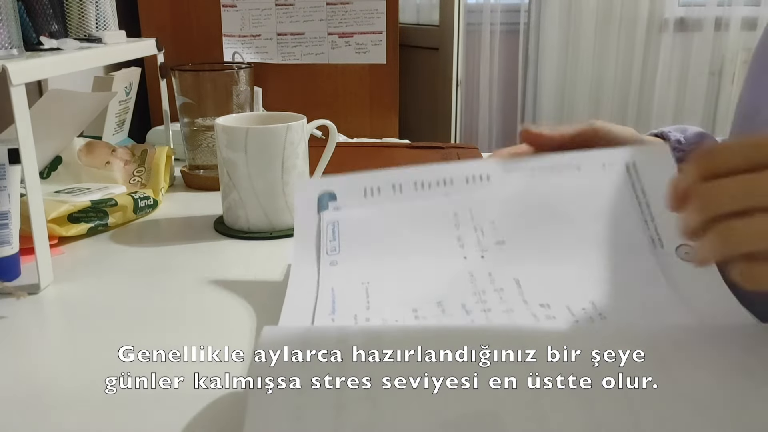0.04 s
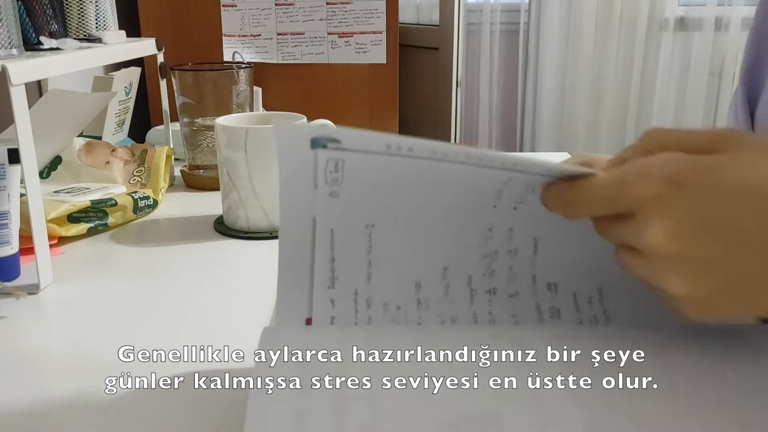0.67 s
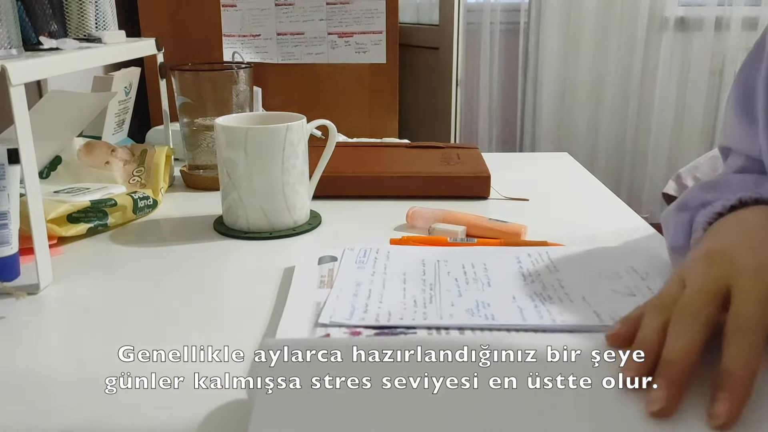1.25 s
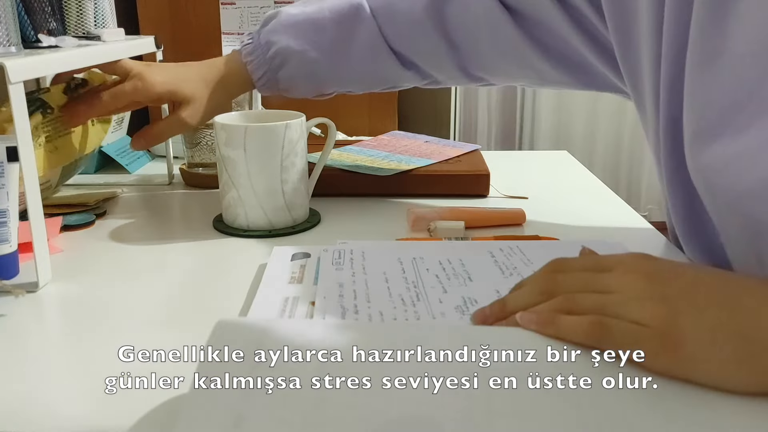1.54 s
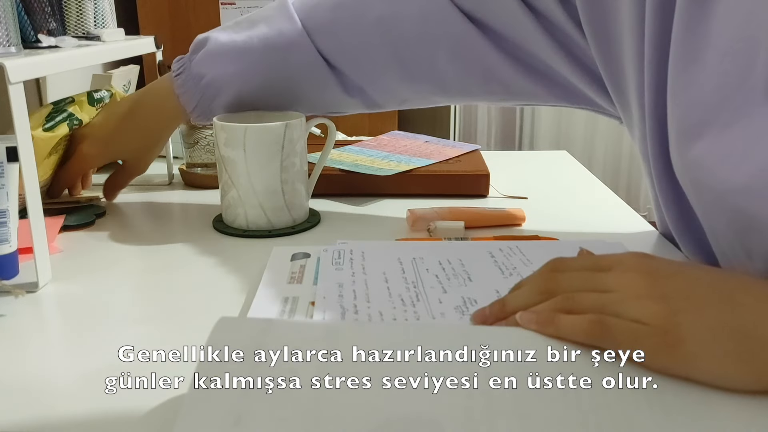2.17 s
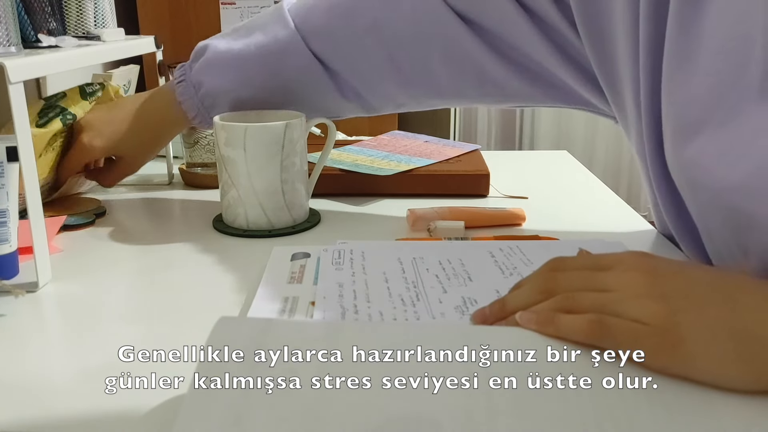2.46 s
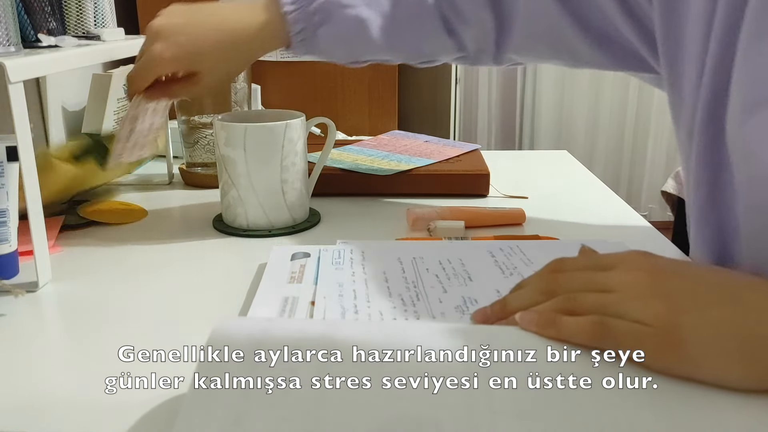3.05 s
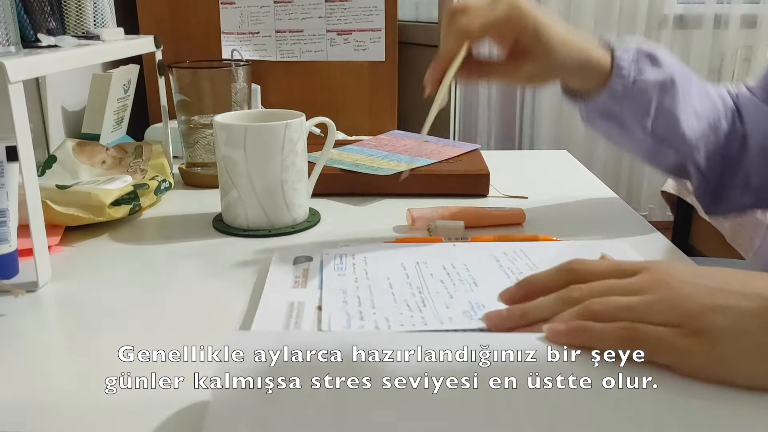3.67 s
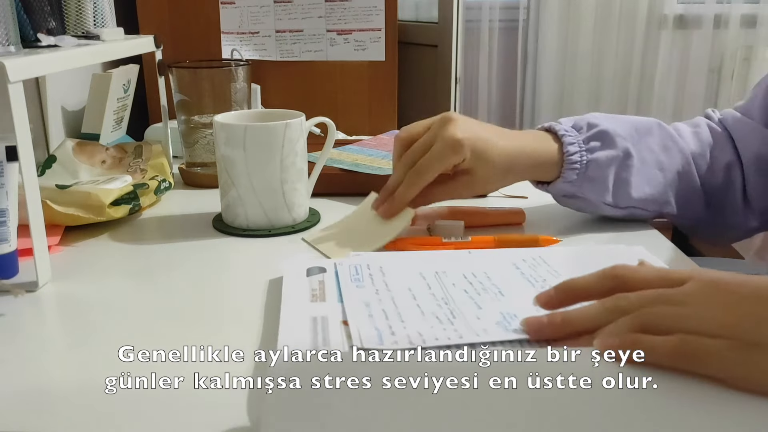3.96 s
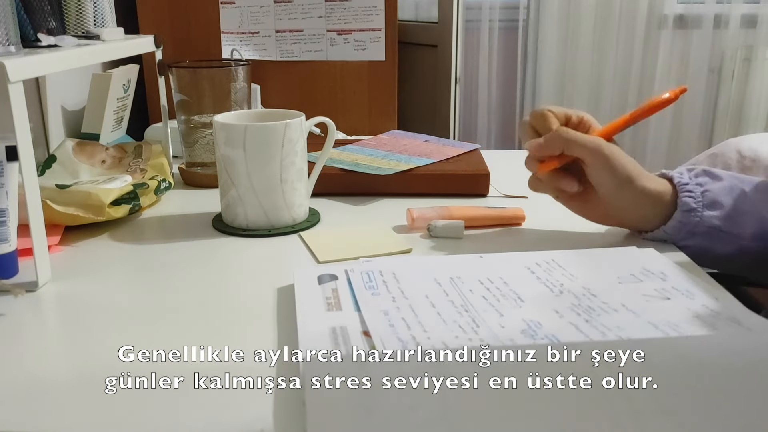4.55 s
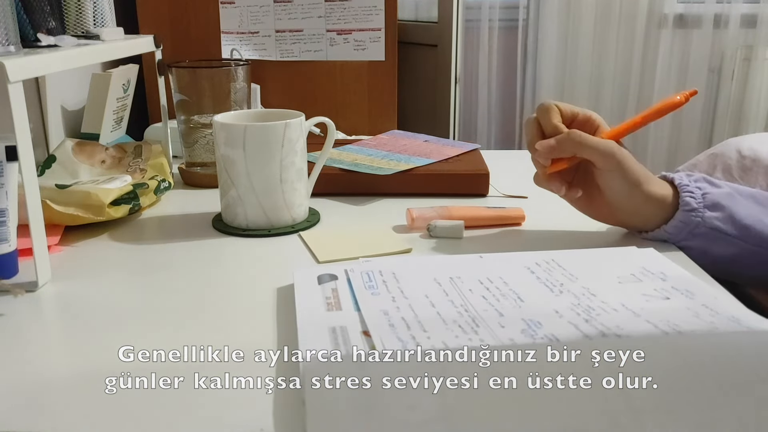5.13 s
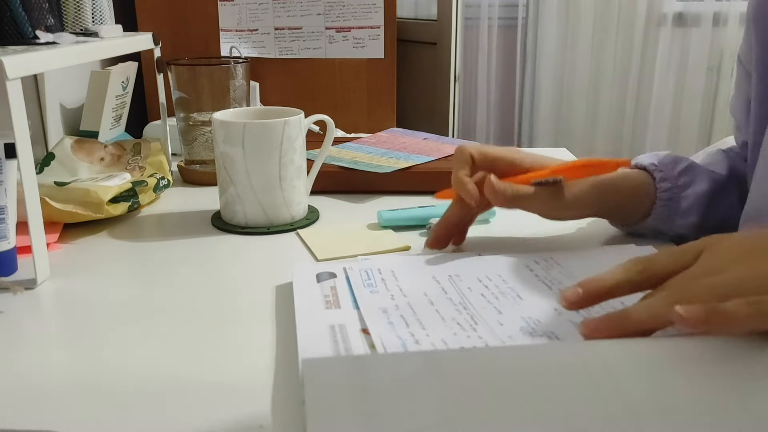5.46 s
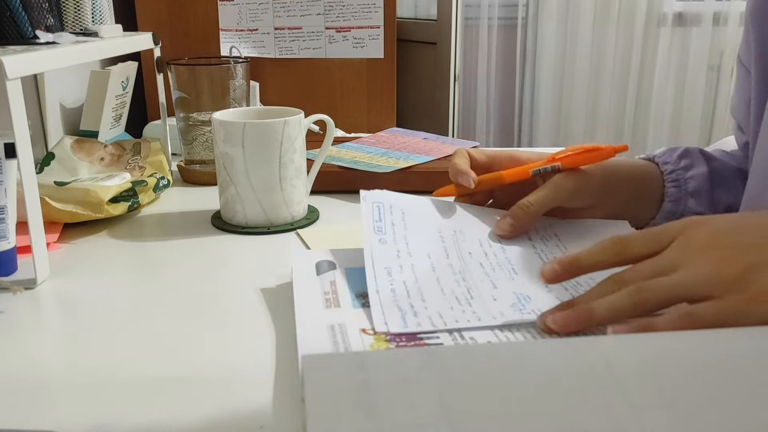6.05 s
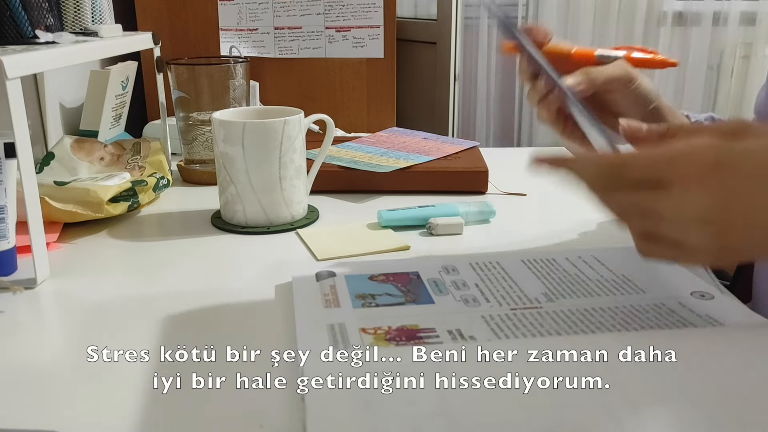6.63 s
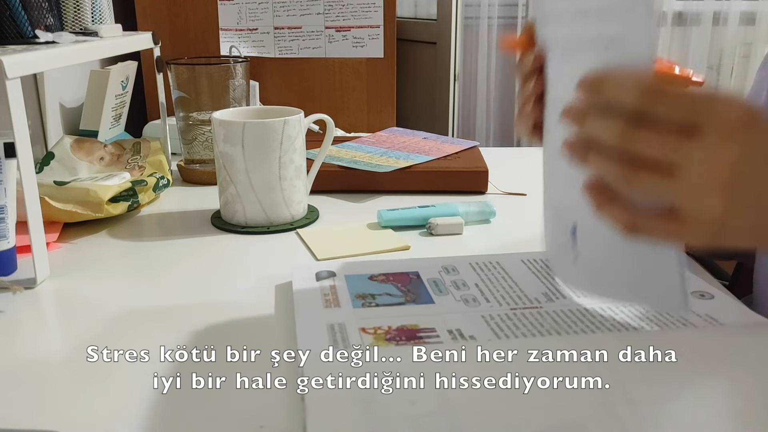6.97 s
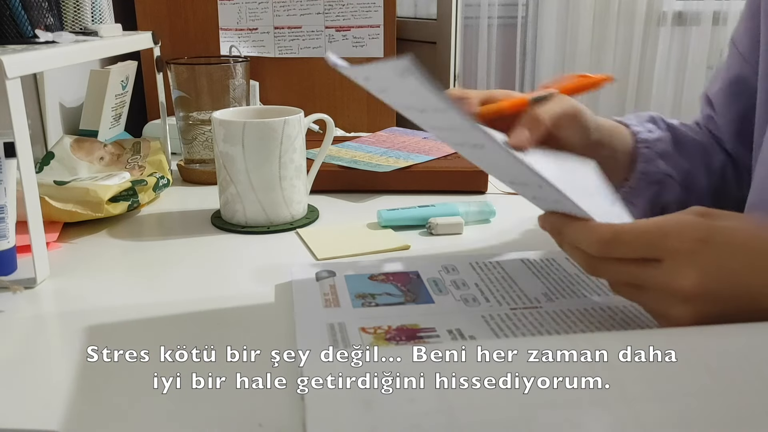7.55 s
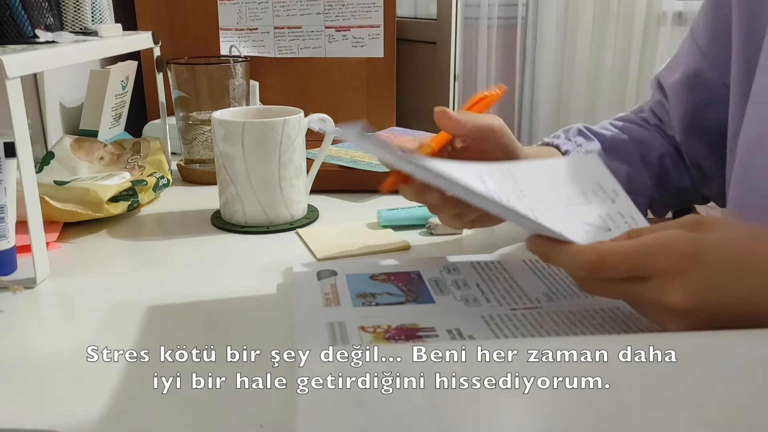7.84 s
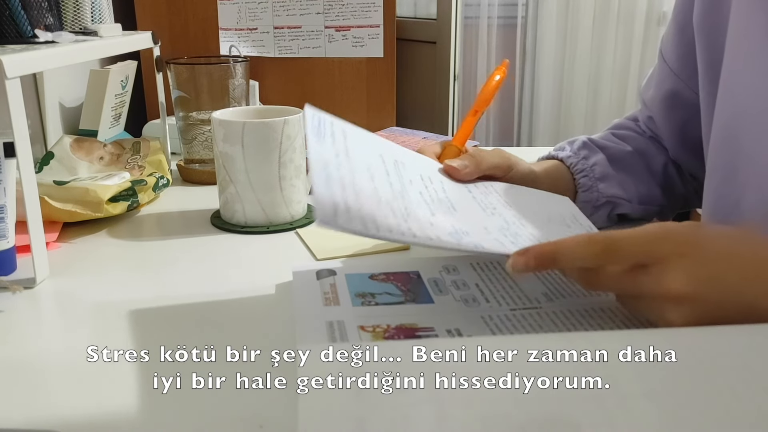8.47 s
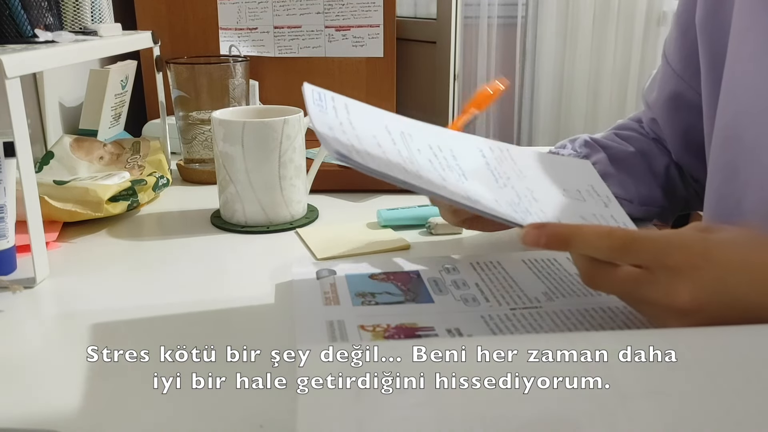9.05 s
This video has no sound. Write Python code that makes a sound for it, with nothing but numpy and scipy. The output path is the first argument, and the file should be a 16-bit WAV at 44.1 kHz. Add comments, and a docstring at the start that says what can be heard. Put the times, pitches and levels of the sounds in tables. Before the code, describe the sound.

Everything is heard close up at a desk in a quiet room, with short echoes and a faint low rumble. For the first 1.5 seconds, workbook pages swish and rustle softly as they are opened and smoothed. From 1.5 to 3.2 seconds a stiff plastic packet crinkles with sharp, dry crackles and small dull thuds. Faint paper sliding follows, with a light tap near 3.9 seconds. At 4.2 seconds a plastic pen clatters briefly on the desk, the loudest sound. A duller bump on the desk comes at 5 seconds. Loose sheets then rustle and scrape with little crease snaps, and at 7 seconds they drop edge-on onto the workbook with a crisp tap. Another paper snap comes at about 7.4 seconds. Light rustling continues until about 8.3 seconds, then thins to a few tiny ticks and scrapes by 9.2 seconds.

```python
"""A desk in a quiet room, heard close up by a phone with two microphones. A workbook is laid open and
smoothed flat, a hand digs sticky notes out from behind a crinkly plastic packet, a pen knocks on the
desk, an arm bumps it, then loose sheets are lifted, dropped on their edge to square them, and held.
Paper rustles as its fibres catch and slip, creases snap, and blows ring the modes of desk and workbook.
Short echoes and a low room rumble sit behind it all."""
import sys
import numpy as np
from scipy import signal
from scipy.fft import rfft, irfft
from scipy.io import wavfile
from scipy.ndimage import uniform_filter1d, map_coordinates

SR = 44100
rng = np.random.default_rng(int(sys.argv[2]) if len(sys.argv) > 2 else 0)


def wrap_up_sound(samples):
    """Save the sound to the file named by the first command line argument, as 16-bit audio."""
    columns = np.atleast_2d(samples).T
    # keep every value between -1 and 1, then stretch to whole-number steps
    tamed = np.clip(columns, -1, 1)
    steps = np.round(tamed * 32767).astype(np.int16)
    wavfile.write(sys.argv[1], SR, steps)


N = 410130
TIME = np.arange(N) / SR

# Hand strokes: start_s, attack_s, hold_s, release_s, level_db, pressure_db
BOOK_STROKES = [(0.003, 0.0036, 0.0026, 0.0062, -54, 4.5), (.08, 0.037, 0.017, 0.04, -55.5, 2),
                (.22, 0.035, 0.095, 0.04, -63.5, -2), (.335, 0.012, 0.097, 0.032, -58, -3),
                (.44, 0.0053, 0.0091, 0.065, -52.5, -16), (.55, 0.08, 0.03, 0.019, -50.5, -6),
                (.70, 0.021, 0.26, 0.053, -60, -4.5), (.97, 0.032, 0.11, .05, -49.5, 2),
                (1.11, 0.024, 0.031, 0.033, -49, 2.5), (1.18, 0.025, 0.012, 0.055, -47, 3),
                (1.28, 0.046, 0.13, 0.083, -56, 1.5)]  # opened, then smoothed flat
PACKET_STROKES = [(1.545, 0.044, 0.094, 0.013, -53, 2), (1.715, 0.023, 0.012, 0.068, -54.5, 3.5),
                  (1.785, 0.0059, 0.19, 0.0079, -51.5, 1), (1.86, 0.021, 0.098, 0.013, -49.5, -16),
                  (1.98, 0.044, 0.12, 0.036, -51.5, -10), (2.15, 0.0068, 0.02, 0.08, -60, 5),
                  (2.398, 0.02, 0.0092, 0.034, -51.5, -6.5), (2.46, 0.11, 0.088, 0.12, -55.5, -1.5),
                  (2.6, 0.096, 0.11, 0.041, -48, -21), (2.72, 0.039, 0.089, 0.023, -48.5, -10),
                  (2.85, 0.028, 0.036, 0.068, -49, -9.5), (2.972, 0.0067, 0.04, 0.027, -46, -5.5),
                  (3.03, 0.04, 0.04, 0.012, -38.5, -13.5), (3.12, 0.013, 0.0086, 0.026, -47.5, 5.5)]  # the hand pushes past, gropes behind and pulls out
NOTE_STROKES = [(3.25, 0.057, 0.17, .1, -78, -6), (3.45, 0.14, 0.027, 0.14, -61, -6),
                (3.63, 0.017, 0.25, 0.065, -66.5, 7), (3.68, 0.024, 0.027, 0.031, -60, -17),
                (3.9, 0.016, .21, 0.042, -59.5, 3.5), (3.975, 0.018, .015, 0.012, -49.5, -9),
                (4.13, 0.054, .03, 0.039, -53, 1.5), (4.28, .03, 0.25, .1, -72.5, -10),
                (4.38, 0.043, 0.071, 0.019, -64.5, -20.5)]  # peeled off and laid down; the hand slides on, the sleeve draws back
SHEET_STROKES = [(4.69, .055, 0.0045, 0.017, -63, -5), (4.8, 0.039, 0.01, 0.024, -59, -8.5),
                 (5.03, 0.019, 0.009, 0.043, -59.5, 11.5), (5.2, 0.0096, 0.015, 0.055, -44.5, -10.5),
                 (5.34, 0.069, 0.016, 0.14, -59, -3.5), (5.594, 0.016, 0.025, 0.024, -47.5, -23),
                 (5.75, 0.022, 0.02, 0.029, -56, -2.5), (5.81, 0.02, 0.047, 0.14, -56.5, -8.5),
                 (5.89, 0.024, 0.019, 0.0089, -59, -13), (5.98, 0.035, 0.27, 0.029, -62, -11.5),
                 (6.27, 0.04, 0.2, 0.055, -61.5, -13), (6.61, 0.059, 0.055, 0.049, -60, -18.5),
                 (6.72, 0.039, 0.063, 0.013, -56.5, -8), (6.95, 0.039, 0.013, 0.0091, -65, -12),
                 (7.003, 0.0009, 0.14, 0.15, -43.5, -14), (7.45, 0.16, 0.14, 0.044, -59, -12.5),
                 (7.64, 0.044, 0.015, 0.05, -55.5, -23), (7.76, 0.045, 0.067, 0.051, -68, -3.5),
                 (7.87, 0.042, 0.03, 0.025, -49, -15), (7.96, 0.017, 0.12, 0.013, -57, -15.5),
                 (8.14, 0.03, .01, 0.064, -66.5, -8.5), (8.24, 0.072, 0.11, 0.068, -70.5, -8)]  # gathered, lifted, let slide onto their edge, held
def handling():
    """Four rustle layers, each with its own grain: workbook, packet, sticky note and loose sheets."""
    return [
        rustle(BOOK_STROKES, slips_per_s=2500, spread_db=3.5, jerk_db=1.5, bend_db=-0.8, flex_hz=590,
               flex_share=0.36, mix_db=(-8.5, -5, -4, -11), lag=-1.2, room_db=4.5),
        rustle(PACKET_STROKES, slips_per_s=450, spread_db=2.5, jerk_db=0.56, bend_db=2, flex_hz=390,
               flex_share=1, mix_db=(-3, -6, -5, -18), lag=9.4, room_db=4.5),
        rustle(NOTE_STROKES, slips_per_s=12000, spread_db=2, jerk_db=0, bend_db=-2.5, flex_hz=457,
               flex_share=0.68, mix_db=(-6.5, -7.5, -7, -13.5), lag=15, room_db=9.5),
        rustle(SHEET_STROKES, slips_per_s=2800, spread_db=3, jerk_db=1.5, bend_db=0.5, flex_hz=357,
               flex_share=1, mix_db=(-2.5, -7, -3, -13), lag=-3.5, room_db=5)]


# Body of a flexing sheet: multiple_of_flex_hz, gain_db
FLEX_EQ = [(0.141, -27.5), (0.352, -3), (0.598, -2), (0.999, -1), (1.401, -1.5), (2, -8.5), (3.5, -17),
           (9, -57.5)]
# Mid rasp, airy hiss and the sparkle of tiny creases popping: freq_hz, gain_db
RASP_EQ = [(300, -36.5), (650, -6.5), (1000, 3.5), (1600, 3.5), (2700, 1.5), (3800, -3.5), (6000, -13.5),
           (14000, -66.5)]
HISS_EQ = [(900, -56.5), (2500, 0), (4000, 9), (6000, 8), (8500, 8), (11000, -4.5), (14500, -1)]
CRINKLE_EQ = [(3000, -13), (8500, -10), (11000, 1.5), (15000, -1), (18000, -22)]
def rustle(table, slips_per_s, spread_db, jerk_db, bend_db, flex_hz, flex_share, mix_db, lag, room_db):
    """Light sliding hisses; pressing adds rasp and flexing. One jerky motion shakes all three."""
    flex_db, rasp_db, hiss_db, crinkle_db = mix_db
    moving = (TIME >= np.floor(table[0][0])) & (TIME < np.ceil(table[-1][0]))
    size = moving.sum()
    shake_db = jerk_db * walk(90)[moving]
    slips = grains(size, slips_per_s, spread_db, smooth=0.4)
    flex_eq = [(multiple * flex_hz, db) for multiple, db in FLEX_EQ]
    rub = 0
    for eq, share, db in (flex_eq, flex_share, flex_db), (RASP_EQ, 1, rasp_db), (HISS_EQ, 0, hiss_db):
        friction = slips + grains(size, slips_per_s, spread_db, smooth=0.2)
        rub += unit(colour(friction, eq)) * strokes(table, share)[moving] * undb(db + shake_db)
    crinkles = colour(grains(size, per_s=240, spread_db=spread_db, smooth=0), CRINKLE_EQ)
    rub += unit(crinkles) * strokes(table, 0)[moving] * undb(crinkle_db)
    sound = np.zeros(N)
    sound[moving] = bend(rub, bend_db)
    return pan(sound, lag), sound * undb(room_db)


def strokes(table, pressure_share):
    """The hand's envelope: each stroke swells, is held and dies away."""
    power = np.zeros(N)
    for start, attack, hold, release, db, pressure_db in table:
        t = TIME[:int((attack + hold + 6 * release) * SR)]
        swell = np.sin(np.pi / 2 * np.minimum(t / attack, 1))
        fade = np.exp(-np.maximum(t - attack - hold, 0) / release)
        add(power, start, (swell * fade * undb(db + pressure_share * pressure_db)) ** 2)
    return np.sqrt(power)


def grains(size, per_s, spread_db, smooth):
    """Fibres catch and slip: tiny clicks of very unequal size over smooth friction noise."""
    strengths = undb(spread_db * np.minimum(rng.exponential(size=size), 5))
    clicks = (rng.random(size) < per_s / SR) * strengths * rng.choice([-1, 1], size)
    return unit(unit(clicks) + smooth * rng.standard_normal(size))


def bend(x, depth_db):
    """A bending sheet shifts its broad resonances from moment to moment."""
    hz, _, frames = signal.stft(x, SR, nperseg=512)
    third_octave = 3 * np.log2(1 + hz / 200)
    moment = np.arange(frames.shape[1]) / 9
    grid = np.meshgrid(third_octave, moment, indexing="ij")
    drift = map_coordinates(rng.standard_normal((24, 512)), grid, mode="mirror")
    return signal.istft(frames * undb(depth_db * drift), SR, nperseg=512)[1][:len(x)]


# Sharp transients: start_s, level_db, pitch_hz, decay_s
SNAPS = [(0.0614, -52, 4000, .002), (0.187, -47, 6000, 0.0033), (.35, -57, 5000, 0.007),
         (.4275, -47, 5000, .005), (0.3889, -53, 1400, 0.0013), (0.458, -40, 2900, 0.0024),
         (0.462, -45, 12500, 0.035), (.6, -48, 12500, .04), (0.9965, -50, 1800, .002),
         (1.1444, -44, 1600, 0.00078), (3.931, -35, 1720, 0.003), (3.9325, -52, 7540, 0.002),
         (4.527, -55, 7100, 0.0019), (4.7955, -57, 6970, 0.0018), (5.038, -32.5, 1180, 0.0051),
         (5.608, -45, 2820, 0.028), (5.874, -43, 1700, 0.003), (5.9615, -39, 2470, 0.0025),
         (6.485, -45.5, 12000, 0.022), (6.81, -46.5, 4900, 0.0058), (6.9206, -48, 6600, 0.0027),
         (7.009, -34.5, 7700, 0.035), (7.0304, -29.5, 1720, 0.00098), (7.0348, -51, 1700, 0.0015),
         (7.353, -31.5, 6800, 0.006), (7.927, -46.5, 890, 0.0053), (8.0656, -44.5, 3990, 0.011),
         (8.71, -63, 6120, 0.0036), (9.172, -68, 2015, 0.0063)]  # creases and edges, plus other sharp contacts such as the arm meeting the desk
PACKET_CRACKLES = [(1.583, -32, 4300, 0.0033), (1.585, -30, 1770, 0.001), (1.5944, -34.5, 6370, 0.0045),
                   (1.645, -31, 4210, 0.0049), (1.6734, -25.5, 5840, 0.0021), (1.676, -43, 1490, 0.0022),
                   (1.6835, -52, 5000, .001), (1.731, -40, 7000, 0.01), (1.741, -23.5, 4180, 0.00062),
                   (1.7418, -29, 5950, .0016), (1.7935, -36.5, 4230, 0.0034), (1.8268, -33, 4000, 0.0043),
                   (1.831, -36, 1440, 0.003), (1.86, -49, 13000, .06), (1.886, -40, 4500, 0.0024),
                   (1.893, -40, 4000, .003), (1.903, -44, 5000, .003), (1.959, -39, 2370, 0.0027),
                   (1.985, -48, 13100, .05), (2.098, -47.5, 1300, 0.0021), (2.2, -53, 2180, 0.0022),
                   (2.3445, -56, 4500, 0.0022), (2.552, -43, 2330, 0.0018), (2.614, -45, 4970, 0.0033),
                   (2.666, -44, 3000, 0.0031), (2.73, -43, 12500, .06), (2.763, -42, 6500, 0.0023),
                   (2.787, -38, 4200, 0.00084), (2.8156, -51, 1100, 0.0015), (2.8856, -43, 7060, 0.0038),
                   (2.899, -42, 7000, 0.0047), (2.926, -40.5, 2240, 0.001), (2.9766, -43, 6500, 0.0039),
                   (3.031, -40, 6500, 0.0032), (3.094, -40, 7000, .003), (3.108, -31.5, 7600, 0.0016),
                   (3.136, -44, 6000, 0.0057), (3.1423, -27.5, 5360, 0.0072), (3.1486, -26.5, 3850, 0.0022),
                   (3.217, -51, 6000, 0.0017)]  # stiff plastic, close and dry
PEN_CLACKS = [(4.1945, -30.5, 2200, 0.0061), (4.2245, -28.5, 1950, 0.0037), (4.2252, -28.5, 2853, 0.0096),
              (4.2285, -23.5, 13000, 0.003), (4.2272, -21.5, 1500, 0.0032), (4.2285, -35, 8000, 0.0068),
              (4.2285, -29, 3706, 0.0087), (4.2365, -32.5, 13000, 0.0037), (4.2345, -28, 1550, .003),
              (4.241, -32.5, 1900, .002), (4.2495, -32.5, 2110, 0.0016)]  # the plastic pen clacks down onto the desk
def snaps(table, lag, room_db, q, tail, tick):
    """A crease flips or hard things touch: a bright tick and brief chatter in a broad resonance."""
    sound, t = np.zeros(N), TIME[:SR // 16]
    for start, db, hz, decay in table:
        chatter = rng.standard_normal(len(t)) * (np.exp(-t / 0.00041) + tail * np.exp(-t / decay))
        snap = band(chatter, hz, q) + tick * band(chatter, hz=9300, q=0.57)
        add(sound, start, undb(db) * crest(snap))
    return pan(sound, lag), sound * undb(room_db)


# Impacts: start_s, level_db, contact_hz, contact_q, ring_time_factor, left_lag_samples, room_db
DESK_KNOCKS = [(3.9322, -32, 376, 0.62, 0.64, 4.5, -1), (4.1935, -35.5, 272, 0.22, 1.2, 3, -19),
               (4.2278, -10.5, 595, 1.05, 0.55, 9, -46), (4.2325, -13.5, 570, 1.3, 0.36, 10.5, -34),
               (4.2415, -20.5, 480, 0.75, 0.2, 23, -28), (4.2485, -32, 1010, 1.5, 0.2, 23, -19),
               (4.275, -36, 375, 4.8, 0.44, 5, -3.5), (4.297, -47.5, 181, 7.5, 0.66, -3, -9),
               (5.0372, -21.5, 321, 11, 0.34, -2, -9.5), (5.05, -28.5, 294, 0.85, 0.18, 4, 0.5),
               (5.073, -39, 178, 2.2, 1.1, 7, -10), (5.085, -52, 530, 16, 3.5, 6, -12),
               (5.216, -42, 268, 6.4, 0.19, 11, -1), (5.21, -46, 95, 1.8, 0.11, 4, -8),
               (5.252, -52, 91, 2, 0.34, 13, -2), (5.784, -48.5, 440, 2.9, 0.91, 7, -11),
               (5.796, -49.5, 240, 1.7, 0.55, 7, -4), (6.408, -46, 755, 1.3, 0.64, 5, 3.5)]  # pen and arm hit the desk
SHEET_LANDINGS = [(7.023, -27.5, 245, 2, 0.63, 4, -12), (7.0295, -32, 500, 2.7, 0.77, 13, -24),
                  (7.0325, -27.5, 830, 2.5, 0.48, 13, -4), (7.04, -34, 290, 4.7, 0.8, 9, -16),
                  (7.0615, -39.5, 193, 1.9, 0.7, 4, -12), (7.05, -41, 98, 2.6, 0.44, 5, -11)]  # the sheets land edge-on on the workbook
# The bodies they ring: pitch_hz, gain_db, t60_s (before ring_time_factor)
DESK_MODES = [(102, -15.5, 0.67), (127, -23, 0.6), (175, -8, 0.18), (245, 3.5, 0.1), (325, -8, 0.087),
              (482, -9.5, 0.099), (544, -4.5, 0.11), (607, 6, 0.044), (693, 4.5, 0.039), (1016, 4, 0.02),
              (1140, -2, 0.058), (1390, -5, 0.073), (1500, -0.5, 0.017), (1615, -0.5, .05),
              (1900, -4.5, 0.04), (2820, 1, 0.035)]
WORKBOOK_MODES = [(97.5, -0.5, 0.092), (175.5, -4, 0.62), (227, 6.5, 0.14), (295, 5, 0.16), (417, 9, 0.13),
                  (444.6, 5, 0.34), (516, 14, 0.1), (702, 3.5, 0.086), (897, 14.5, 0.035), (1160, 2, .08),
                  (1810, 17, 0.04)]
def knocks(blows, body, clatter):
    """Blows ring a board; the softness of the contact picks which of its modes speak."""
    direct, send, t = np.zeros((2, N)), np.zeros(N), TIME[:SR // 4]
    hz, mode_db, t60 = np.transpose(body)[:, :, None]
    onset = 1 - np.exp(-t / 0.002)  # bending waves need a moment to spread
    for start, db, contact_hz, q, ring, lag, room_db in blows:
        detune = 1 + 0.0077 * rng.standard_normal(hz.shape)
        fade = undb(-60 * t / (t60 * ring))
        modes = np.sum(undb(mode_db) * fade * np.sin(2 * np.pi * hz * detune * t), axis=0)
        weak_modes = band(rng.standard_normal(len(t)), hz=1400, q=0.42) * np.exp(-t / (0.016 * ring))
        blow = band((modes + clatter * weak_modes) * onset, contact_hz, q)
        radiated = rolloff(blow, contact_hz / 5, "high", order=2)  # a board radiates little deep bass
        hit = undb(db) * crest(radiated)
        add(direct, start, pan(hit, lag))
        add(send, start, hit * undb(room_db))
    return direct, send


# Soft thuds of handled book, packet and sheets, plus one low swell of room rumble:
# start_s, level_db, pitch_hz, shudder_s
SOFT_THUDS = [(0.388, -47.5, 840, 0.0052), (0.463, -45, 774, 0.017), (0.647, -41.5, 590, 0.0087),
              (0.765, -49.5, 426, 0.01), (0.996, -41, 700, 0.006), (0.997, -41, 322, 0.012),
              (1.142, -37, 690, 0.0044), (1.142, -36, 350, .004), (1.586, -40.5, 392, 0.0058),
              (1.636, -43, 510, .006), (1.647, -35.5, 480, 0.01), (1.673, -39, 493, 0.0045),
              (1.741, -34, 500, 0.0045), (1.79, -37, 416, .008), (1.805, -45, 517, .006),
              (1.801, -37.5, 135, 0.0047), (1.829, -29, 467, 0.0079), (1.825, -39, 117, 0.0074),
              (1.888, -35.5, 480, 0.0074), (1.961, -39, 477, .005), (1.972, -37, 384, 0.01),
              (2.097, -38.5, 275, 0.015), (2.134, -45, 420, 0.006), (2.178, -45, 443, 0.015),
              (2.219, -46.5, 497, 0.009), (2.553, -42.5, 445, 0.0081), (2.577, -40.5, 425, 0.0044),
              (2.66, -43, 403, 0.0098), (2.75, -44, 243, 0.0046), (2.815, -34.5, 443, 0.0022),
              (2.915, -44.5, 446, 0.021), (2.988, -37, 338, 0.012), (3.146, -31.5, 407, 0.014),
              (3.157, -48, 233, 0.011), (3.183, -41, 262, 0.0067), (5.53, -50, 285, 0.0081),
              (5.721, -54, 240, 0.031), (5.759, -52, 330, 0.0081), (5.819, -55, 220, 0.007),
              (5.885, -50, 284, 0.0073), (5.964, -44.5, 640, 0.0034), (6.64, -51, 83, .02),
              (7.355, -47.5, 400, .01), (7.543, -50, 480, 0.014), (8.169, -54, 195, 0.012)]
def thuds(lag, room_db, q, judder):
    """One soft push and a brief shudder sound through a dull, damped resonance."""
    sound, t = np.zeros(N), TIME[:SR // 8]
    for start, db, hz, decay in SOFT_THUDS:
        push = signal.unit_impulse(len(t)) + judder * rng.standard_normal(len(t)) * np.exp(-t / decay)
        thud = band(band(push, hz, q), hz, q / 2)
        add(sound, start, undb(db) * crest(thud))
    return pan(sound, lag), sound * undb(room_db)


# Pitched scrapes and flicks of paper edges: start_s, length_s, level_db, pitch_hz, resonance_q
EDGE_SCRAPES = [(0.601, 0.11, -61.5, 604, 3.6), (0.66, 0.16, -70, 890, 5.5),
                (0.865, 0.06, -64.5, 1080, 1.7), (1.035, 0.052, -53.5, 746, 1.5),
                (1.158, 0.095, -46, 2270, 0.99), (1.272, 0.19, -58, 573, 6.2), (1.299, .19, -62, 790, 4.4),
                (1.431, 0.074, -58.5, 577, 13), (2.222, 0.061, -74.5, 940, 36),
                (2.833, 0.025, -59, 4200, 6.2), (5.834, 0.042, -53, 4270, 1),
                (5.902, 0.03, -56.5, 1920, 17), (5.903, 0.032, -45.5, 3320, 1.1),
                (5.905, 0.034, -59, 1150, 1.8), (5.958, 0.0084, -43, 2860, 10),
                (7.823, 0.062, -71, 1320, 6), (7.912, 0.026, -56, 2730, 3.1),
                (7.916, 0.063, -65.5, 1020, 3.9), (8.035, 0.01, -63, 2500, 1.6),
                (8.062, 0.012, -54.5, 3000, 2.1), (8.09, 0.016, -72, 1050, 5.2),
                (8.41, 0.16, -82, 1180, 3.2), (8.886, .085, -79, 777, 4), (9.155, 0.038, -77, 1015, 6.3)]
def scrapes(lag, room_db, slips_per_s, spread_db, skirt):
    """An edge sticks and slips along a sheet, whose curve rings for as long as the stroke lasts."""
    sound, t = np.zeros(N), TIME[:SR // 3]
    for start, length, db, hz, q in EDGE_SCRAPES:
        swell = np.sqrt(np.maximum(np.sin(np.pi * np.minimum(t / length, 1)), 0))
        friction = grains(len(t), slips_per_s, spread_db, smooth=0.31) * swell
        ring = band(band(friction, hz, q), hz, q * skirt)
        stroke_rms = np.sqrt(np.sum(ring ** 2) / (length * SR))
        add(sound, start, undb(db) * ring / stroke_rms)
    return pan(sound, lag), sound * undb(room_db)


def room(send):
    """Hands and paper keep moving, so the reverb drifts among four echo patterns."""
    shares = np.array([walk(16) for _ in range(4)])
    shares /= np.sqrt(np.sum(shares ** 2, axis=0))
    return sum(signal.oaconvolve((send * share)[None], reflections(), axes=1)[:, :N] for share in shares)


def reflections(bass_t60_s=0.24, treble_t60_s=0.19):
    """Echoes of desk, shelf and walls; the bass is alike at both microphones and lasts longer."""
    t = TIME[:SR // 3]
    mid, side = rng.standard_normal((2, len(t)))
    side = rolloff(side, 600, "high")
    field = np.array([mid + side, mid - side])
    bass = rolloff(field, 1500, "low")
    tail = bass * undb(-60 * t / bass_t60_s) + (field - bass) * undb(-60 * t / treble_t60_s)
    early_boost = 1 + 9.6 * np.exp(-t / 0.0008)
    response = tail * early_boost * (t > 0.001)
    return response / np.sqrt(np.sum(response ** 2) / 2)


# Quiet background bed: freq_hz, gain_db
ROOM_TONE_EQ = [(20, 8), (32, -15.5), (50, 4), (63, 12), (85, -3.5), (130, -4.5), (280, -4), (450, -8.5),
                (750, -14.5), (1100, -22), (2000, -24), (4000, -22), (8000, -26.5), (15000, -29)]
def room_tone(level_db=-62):
    """Low rumble common to both microphones, and faint hiss of their own; the level wavers."""
    mid, side = (colour(rng.standard_normal(N), ROOM_TONE_EQ) for _ in range(2))
    side -= 0.65 * rolloff(side, 453, "low")
    return np.array([mid + side, mid - side]) / np.std(mid) * undb(level_db + walk(3.2))


def pan(x, lag):
    """The farther microphone hears it later and weaker; lag is the left one's delay in samples."""
    tilt = undb(0.4333 * lag / 2)
    return np.array([np.roll(x, round(lag)) / tilt, x * tilt])


def undb(db):
    """Decibels to gain."""
    return 10 ** (np.asarray(db) / 20)


def unit(x):
    """Scale to rms 1."""
    return x / np.sqrt(np.mean(x ** 2))


def crest(x):
    """Scale a hit so that its loudest 2 ms have rms 1."""
    return x / np.sqrt(uniform_filter1d(x ** 2, 88).max())


def colour(x, points, size=4096):
    """Minimum-phase EQ through (freq_hz, gain_db) points."""
    hz, db = np.transpose(points)
    grid = np.maximum(np.fft.rfftfreq(size, 1 / SR), 1)
    gain = undb(np.interp(np.log(grid), np.log(hz), db))
    cepstrum = irfft(np.log(gain))
    cepstrum[1:size // 2] *= 2
    cepstrum[size // 2 + 1:] = 0
    return signal.fftconvolve(x, irfft(np.exp(rfft(cepstrum))))[:len(x)]


def band(x, hz, q):
    """One resonance, gain 1 at its centre."""
    hz = min(hz, SR / 3)
    return signal.lfilter(*signal.iirpeak(hz, max(q, hz / (SR / 4)), fs=SR), x)


def rolloff(x, hz, kind, order=1):
    """Gentle low-pass or high-pass."""
    return signal.sosfilt(signal.butter(order, hz, kind, fs=SR, output="sos"), x)


def add(track, start_s, sound):
    """Mix a sound in at start_s."""
    i = int(start_s * SR)
    track[..., i:i + sound.shape[-1]] += sound[..., :N - i]


def walk(turns_per_s):
    """Smooth random wander, spread near 1."""
    knots = rng.standard_normal(4096)
    return 1.4 * np.interp(TIME * turns_per_s, np.arange(len(knots)), knots)


def scene():
    """Each layer gives a stereo direct sound and a send to the shared room; room tone lies beneath."""
    layers = [
        *handling(),
        snaps(SNAPS, lag=12, room_db=3, q=1.1, tail=0.32, tick=0.0081),
        snaps(PACKET_CRACKLES, lag=12, room_db=-2, q=2.7, tail=0.34, tick=0.03),
        snaps(PEN_CLACKS, lag=17, room_db=-12, q=5.2, tail=1, tick=0.02),
        thuds(lag=7.8, room_db=-25, q=2.14, judder=0.15),
        scrapes(lag=-1.8, room_db=-1.5, slips_per_s=1200, spread_db=3, skirt=0.47),
        knocks(DESK_KNOCKS, DESK_MODES, clatter=0.86),
        knocks(SHEET_LANDINGS, WORKBOOK_MODES, clatter=1)]
    direct, send = (sum(bus) for bus in zip(*layers))
    return direct + room(send) + room_tone()


# Tone of the two microphone ports: freq_hz, gain_db
LEFT_PORT_EQ = [(60, 4), (500, -1), (1000, 3), (2000, -2), (4000, -10), (5500, -9), (6900, -5.5),
                (7700, -0.5), (8500, 2.5), (9300, -0.5), (10200, -21), (12000, -14), (15000, -21)]
RIGHT_PORT_EQ = [(60, 0), (500, -6), (1000, 0.5), (2000, -1), (4000, -7.5), (5500, -4.5), (6900, 3),
                 (7700, 2), (8500, -4.5), (9300, -7.5), (10200, -10.5), (12000, -16.5), (15000, -18.5)]
def record(dry):
    """Each port's resonance colours its channel; the top is cut steeply at 15.2 kHz."""
    heard = np.array([colour(dry[0], LEFT_PORT_EQ), colour(dry[1], RIGHT_PORT_EQ)])
    return signal.sosfilt(signal.ellip(8, 0.2, 70, 15200, fs=SR, output="sos"), heard)


dry = scene()
out = record(dry)
wrap_up_sound(out)
```